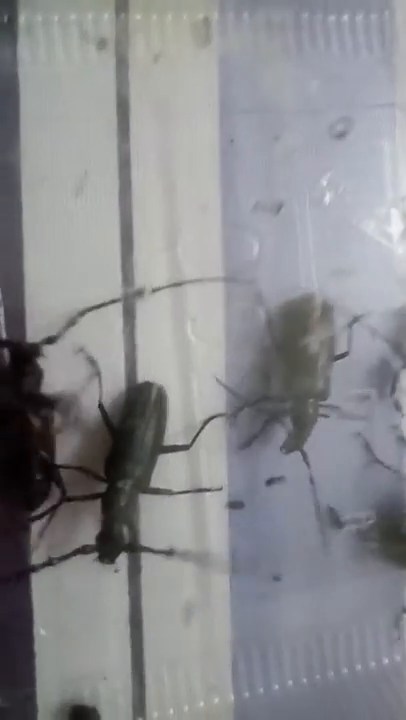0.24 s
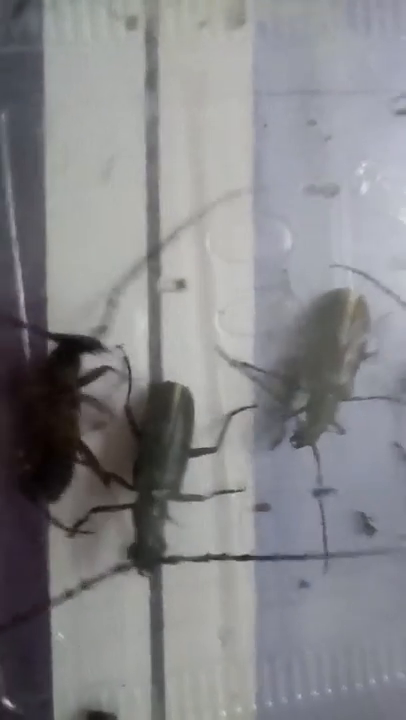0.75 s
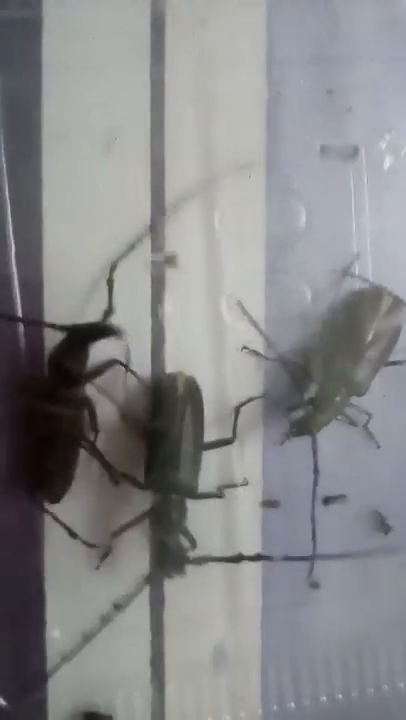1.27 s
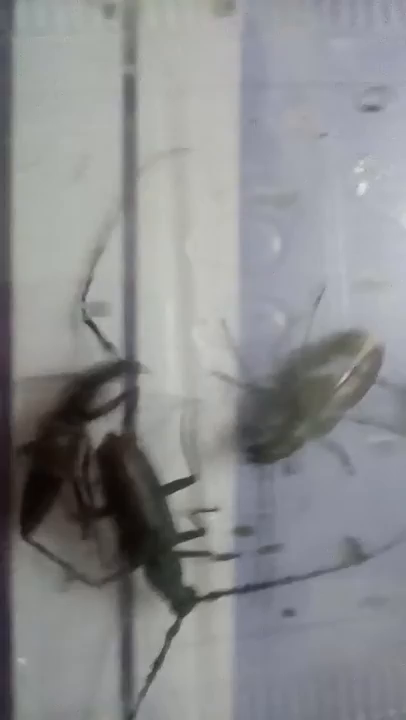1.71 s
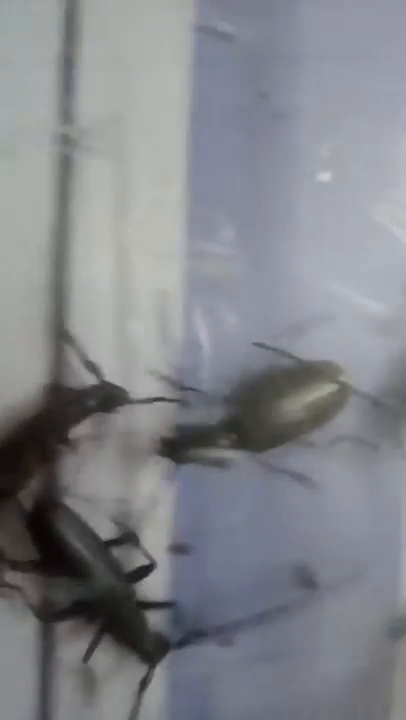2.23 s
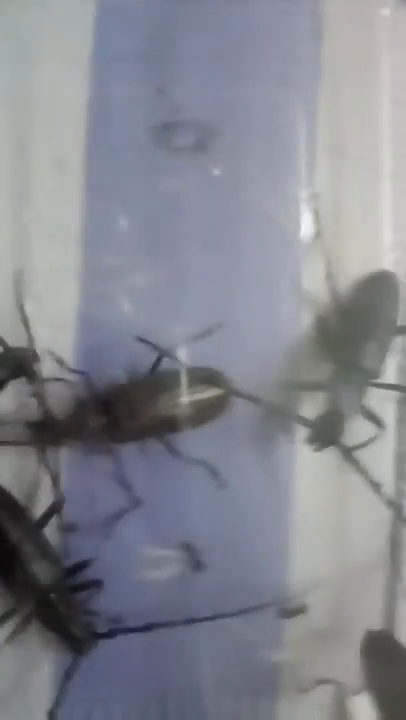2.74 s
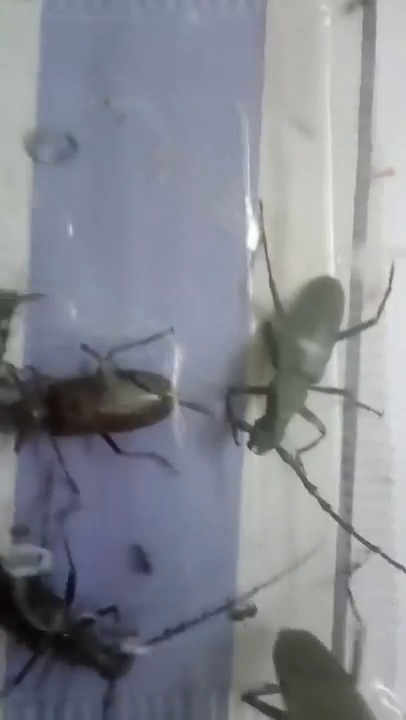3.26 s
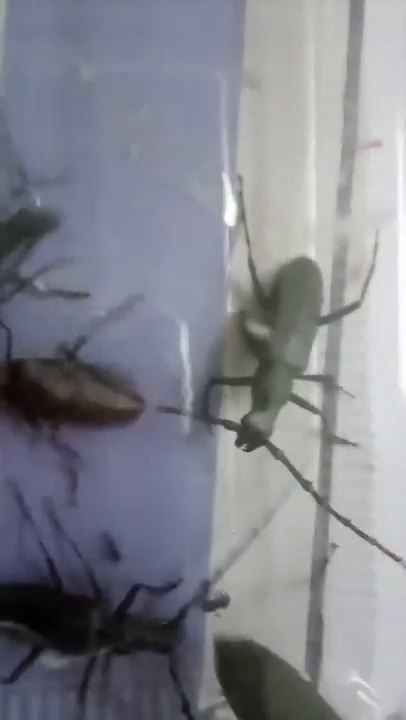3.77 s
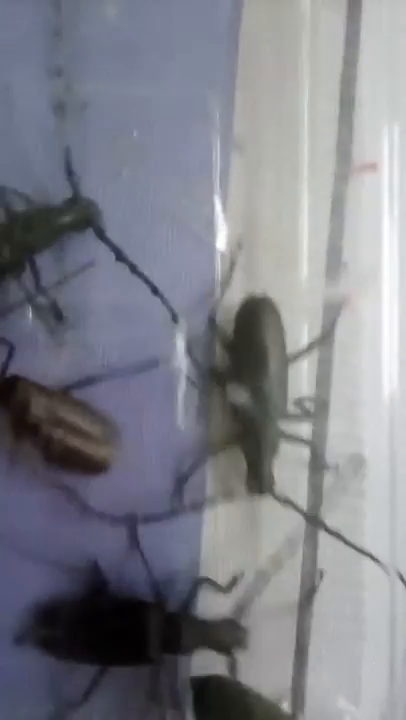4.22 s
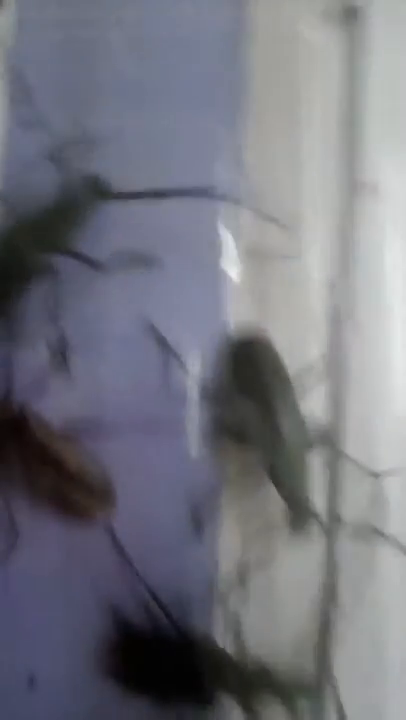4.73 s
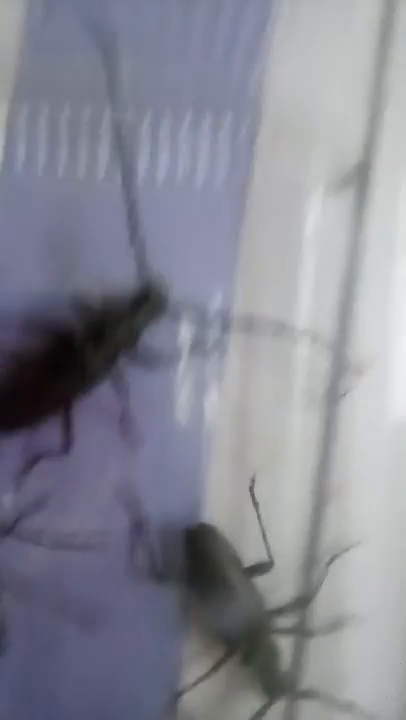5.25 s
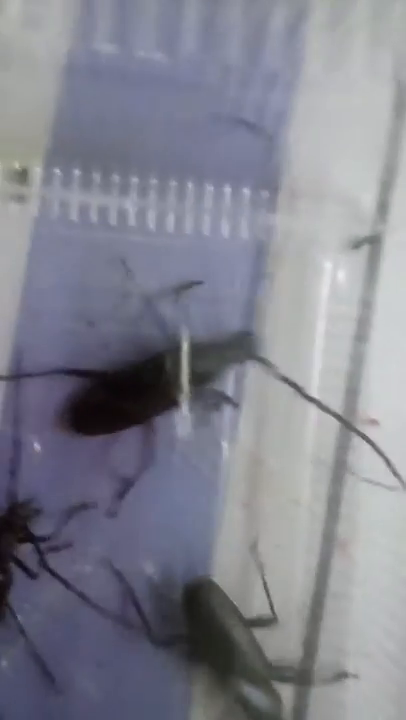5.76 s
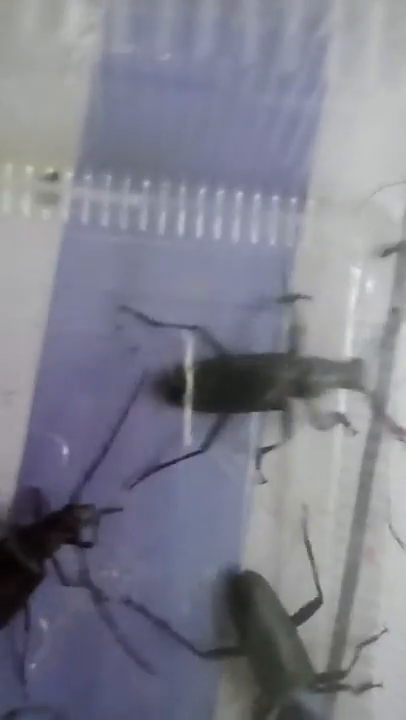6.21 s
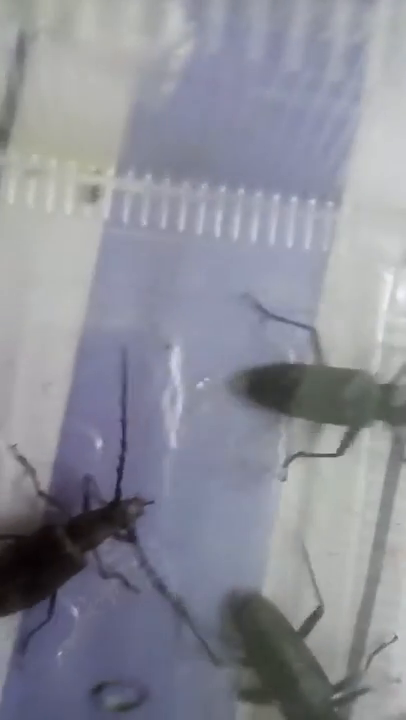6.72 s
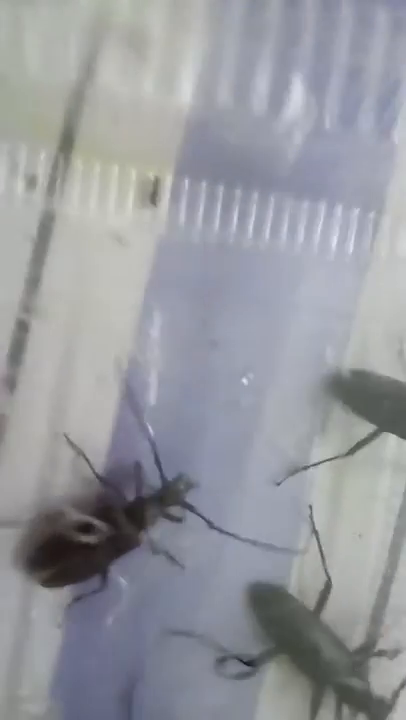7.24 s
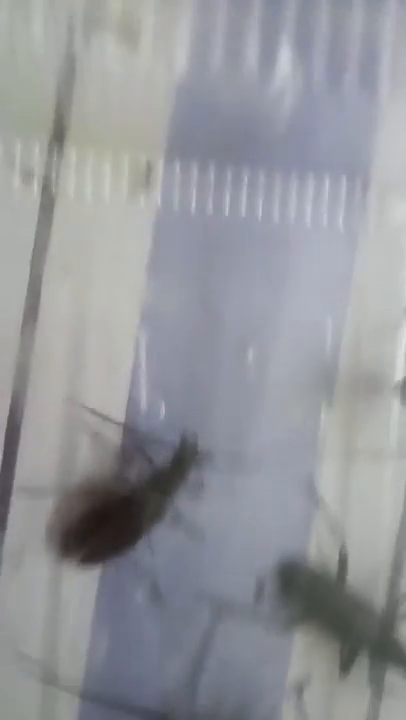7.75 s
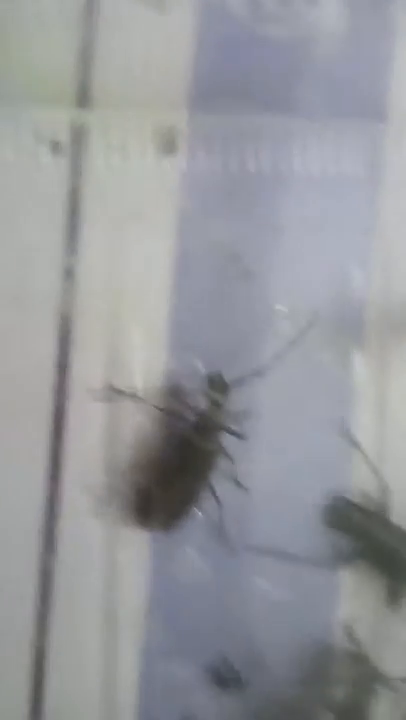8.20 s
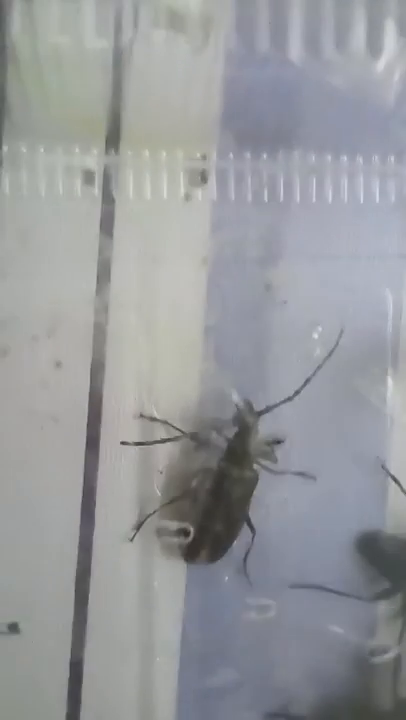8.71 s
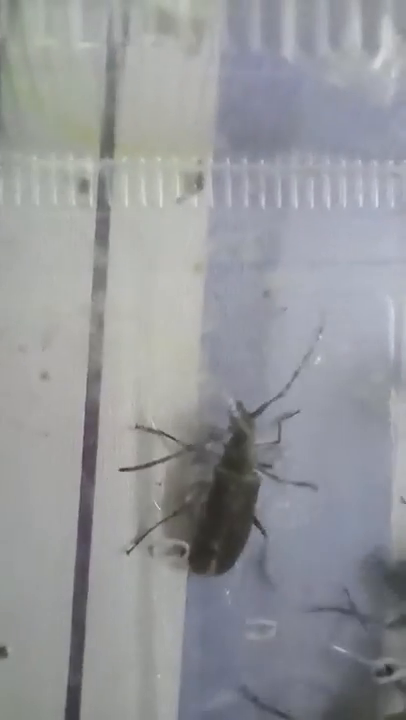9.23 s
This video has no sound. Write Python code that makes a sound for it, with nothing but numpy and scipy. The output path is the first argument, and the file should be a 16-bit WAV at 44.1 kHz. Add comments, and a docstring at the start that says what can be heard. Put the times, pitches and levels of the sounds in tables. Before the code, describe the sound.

Large beetles clamber in a thin plastic tub, close to the microphone, in a quiet room with faint hiss and a weak low hum. From 0 to 3 seconds there is fine, dry pattering with small scrapes and isolated clicks, some clustered near 2.5. At about 3.2 a claw cracks brightly and skids, with rasping and smaller ticks until 4. Sparse scratches continue; around 5 to 6 the tub is handled, giving soft hollow scuffs, a short groan and a dull knock at 5.8. A short squeak comes at 6.3, and a long scrape and sharp crack at 6.9. From 7.4 to 7.75 comes the strongest struggle: hard scrapes, rapid cracks, hollow knocks and a low rumble. Faint gliding groans follow near 7.9. At 8.4 three very quick cracks merge into one loud snap that rings briefly. Then quiet rustling, with one last click near 9.5.

```python
"""Beetles in a plastic tub

Longhorn beetles clamber about in a thin plastic tub, close to the microphone, in a quiet room. Legs fidget and
patter more strongly with effort; some drag hard, or a claw catches and skids: stick-slip and cracks ring the wall.
Handled, the tub scuffs, knocks, rumbles and groans (friction and blows on low modes, gliding tones).
Claws squeak briefly as unsteady tones; one loud snap is three quick cracks. A faint hum and hiss lie under it all.
"""
import sys
import numpy as np
from scipy import signal
from scipy.fft import rfft, irfft, next_fast_len
from scipy.io import wavfile
from scipy.ndimage import uniform_filter1d, map_coordinates

SR = 44100
rng = np.random.default_rng(int(sys.argv[2]) if len(sys.argv) > 2 else 0)


def wrap_up_sound(samples):
    """Save the sound to the file named by the first command line argument, as 16-bit audio."""
    columns = np.atleast_2d(samples).T
    # keep every value between -1 and 1, then stretch to whole-number steps
    tamed = np.clip(columns, -1, 1)
    steps = np.round(tamed * 32767).astype(np.int16)
    wavfile.write(sys.argv[1], SR, steps)


N = 417627
TIME = np.arange(N) / SR
AGE = np.arange(SR // 3) / SR  # s since the start of one event
FIRM_DB = -43  # an ordinary catch or drag


def amp(db):
    """Decibels to gain."""
    return 10 ** (np.asarray(db) / 20)


def unit(x):
    """Scale to rms 1."""
    return x / np.sqrt(np.mean(x ** 2) + 1e-20)


def peaked(x, db):
    """Scale x so that its loudest two milliseconds have this rms level."""
    power = uniform_filter1d(x * x, SR // 500)
    return x * amp(db) / np.sqrt(power.max())


def held(x, db, length_s):
    """Scale x to the energy of this rms level held for length_s."""
    return x * amp(db) * np.sqrt(length_s * SR / (np.sum(x * x) + 1e-20))


def add(track, s, x):
    """Mix x into the track at s seconds."""
    part = track[max(round(s * SR), 0):][:len(x)]
    part += x[:len(part)]


def along(points, hz):
    """(Hz, value) points read on a log frequency axis."""
    f, v = np.transpose(points)
    return np.interp(np.log(hz + 1), np.log(f + 1), v)


def wobble(rate_hz, size=N):
    """A smooth random curve, rate_hz knots a second."""
    knots = rng.standard_normal(int(size * rate_hz / SR) + 4)
    return map_coordinates(knots, [TIME[:size] * rate_hz])


def colour(x, *spectra):
    """Causal minimum-phase filter with the summed dB gains of the given spectra."""
    m = 2 * next_fast_len(len(x) // 2 + 2048)
    hz = np.fft.rfftfreq(m, 1 / SR)
    gain_db = sum(along(points, hz) for points in spectra)
    cepstrum = irfft(np.log(amp(gain_db)))
    cepstrum[1:m // 2] *= 2  # fold to the causal side
    cepstrum[m // 2 + 1:] = 0
    return irfft(rfft(x, m) * np.exp(rfft(cepstrum)))[:len(x)]


def fade(t60_s):
    """A decay that loses 60 dB in t60_s."""
    return np.exp(-np.log(1000) * AGE / t60_s)


def burst(t60_s):
    """Dying noise of energy 1: many crowded modes struck at once."""
    x = rng.standard_normal(len(AGE)) * fade(t60_s)
    return x / np.linalg.norm(x)


def ring(modes, blur_hz=0):
    """Damped sines from (Hz, dB, t60 s) rows, energy 1; random phase drift widens each line by blur_hz."""
    x = np.zeros(len(AGE))
    for hz, db, t60_s in modes:
        drift = 0
        if blur_hz:
            drift = np.cumsum(rng.standard_normal(len(AGE))) * np.sqrt(2 * np.pi * blur_hz / SR)
        x += amp(db) * fade(t60_s) * np.sin(2 * np.pi * (hz * AGE + rng.random()) + drift)
    return x / np.linalg.norm(x)


def spot(low_hz, high_hz, mean_t60_s, spread_db, count):
    """Every spot of the wall favours its own few modes; the higher ones die sooner."""
    hz = low_hz + (high_hz - low_hz) * (np.arange(count) + rng.random(count)) / count
    db = spread_db * rng.standard_normal(count)
    t60_s = mean_t60_s * np.sqrt(hz.mean() / hz)
    return ring(zip(hz, db, t60_s))


def swell(length_s):
    """Pressure rises and falls over one stroke."""
    return np.sqrt(np.abs(np.sin(np.pi * AGE / length_s))) * (AGE < length_s)


def friction(length_s, slips_per_s, size_db, wall, glide):
    """Stick and slip: tiny jerks in clumps ring the wall, whose pitch slides as the contact moves."""
    size = len(AGE)
    slips = (rng.random(size) < slips_per_s / SR) * rng.choice([-1, 1], size)
    slips = slips * amp(size_db * (rng.standard_normal(size) + wobble(86.2, size)))
    rung = signal.fftconvolve(slips * swell(length_s), wall)[:size]
    position = np.cumsum(1 + glide * wobble(14.04, size))
    return map_coordinates(rung, [position])


def whistle(length_s, db, hz, flutter_db, waver_hz=55):
    """Fast, nearly even slipping: one unsteady tone under the pressure of a stroke."""
    size = len(AGE)
    phase = 2 * np.pi * np.cumsum(hz + waver_hz * wobble(620, size)) / SR
    flutter = amp(flutter_db * wobble(82.5, size))
    return held(np.sin(phase) * swell(length_s) * flutter, db, length_s)


# Room decay: f/Hz, t60/s
ROOM_DECAY = [(150, 0.5), (600, 0.25), (4000, 0.24), (13000, 0.039)]


def room(x, wet_db, count=3):
    """Add the room's noise-like tail, a blend of count tails that changes as the tub is moved about."""
    out = x.copy()
    for k in range(count):
        hz, t, z = signal.stft(rng.standard_normal(SR // 2), SR, nperseg=256)
        decay = np.exp(-np.log(1000) * t / along(ROOM_DECAY, hz)[:, None])
        tail = signal.istft(z * decay, SR, nperseg=256)[1]
        share = np.cos(2 * np.pi * TIME + np.pi * k / count) * np.sqrt(2 / count)
        out += amp(wet_db) * signal.fftconvolve(x * share, tail / np.linalg.norm(tail))[:N]
    return out


# Colour of room air and hiss: f/Hz, relative level/dB
AIR_COLOUR = [(20, -28), (48, -3.5), (65, -12), (110, -3.5), (200, -2.5), (500, -9), (1500, -20),
              (6200, -11.5), (9000, -33), (14500, -32)]


def background(air_db=-76.0, hum_db=-81.0, hum_hz=148, waver_hz=2.06):
    """Room air and microphone hiss as coloured noise; a distant fan's hum as a sine wavering in pitch and level."""
    air = unit(colour(rng.standard_normal(N), AIR_COLOUR))
    phase = 2 * np.pi * np.cumsum(hum_hz + waver_hz * wobble(19.0)) / SR
    hum = np.sin(phase) * amp(0.24 * wobble(45))
    return amp(air_db) * air + amp(hum_db) * unit(hum)


# Beetles' struggle: t/s, effort level/dB (a calm walk is CALM_DB)
STRUGGLE = [(0.0, -62), (0.34, -73.5), (2.11, -73), (2.6, -66), (2.77, -85.5), (2.92, -65.5), (3.27, -51),
            (3.6, -60.5), (3.83, -60.5), (3.9, -89), (3.98, -63), (4.3, -62), (4.52, -69), (7.35, -66),
            (7.55, -43), (7.84, -68.5), (8.49, -69), (8.78, -73)]
CALM_DB = -70


def effort(s):
    """Decibels by which the beetles' struggle exceeds a calm walk."""
    return np.interp(s, *np.transpose(STRUGGLE)) - CALM_DB


# Colour of the thin plastic wall: f/Hz, gain/dB
WALL_COLOUR = [(30, -99), (100, -21), (650, -19.5), (1500, -9.5), (2800, -8.5), (3950, -2.5), (4500, 1.5),
               (5400, 3), (6000, 8.5), (6700, -0.5), (7500, -6), (8400, -8), (9500, -18.5), (14500, -34)]


def shuffle(calm_level_db=-76, db_per_db=1.213, slips_per_s=1000, size_db=2.0, sway_db=4, body_db=1):
    """Bodies and legs never quite stop sliding: a fine, fluttering grain of slips that swells with effort."""
    slips = (rng.random(N) < slips_per_s / SR) * rng.standard_normal(N)
    slips = slips * amp(size_db * wobble(110) + sway_db * wobble(13))
    rung = signal.fftconvolve(slips, burst(0.021))[:N]
    grain = unit(colour(rung, WALL_COLOUR, [(2700, body_db), (4800, 0.025)]))
    return amp(calm_level_db + db_per_db * effort(TIME)) * grain


def ticks(per_s=38, size_db=5, calm_level_db=-76.0, db_per_db=0.16, count=8):
    """Tiny foot contacts patter without pause, each foot ringing its own part of the wall, harder with effort."""
    out = np.zeros(N)
    for foot in range(count):
        force = amp(size_db * np.clip(rng.standard_normal(N), -2, 2))
        steps = (rng.random(N) < per_s / count / SR) * force
        wall = spot(2300, 7500, mean_t60_s=0.07, spread_db=6.5, count=7) + burst(0.01)
        out += signal.fftconvolve(steps, wall)[:N]
    patter = unit(colour(out, WALL_COLOUR))
    return room(amp(calm_level_db + db_per_db * effort(TIME)) * patter, wet_db=-20.0)


# Resonances shared by the whole wall: f/Hz, relative level/dB, t60/s
SHARED_MODES = [(1176, -6.5, 0.044), (2805, 7, 0.021), (3263, -2, 0.044), (4740, -13.5, 0.11),
                (6430, -3, 0.096)]
STROKE_DROP_DB = 8.5  # grip lost over a stroke


def scrape(length_s, db, body_db, slips_per_s=650, ring_db=0, damping_db_per_db=0.4, shared_db=-1):
    """A leg drags over a fresh spot and gradually loses grip; hard pressure damps the spot's ring."""
    spot_db = ring_db - damping_db_per_db * (db - FIRM_DB)
    wall = burst(0.0061) + amp(shared_db) * ring(SHARED_MODES)
    wall = wall + amp(spot_db) * spot(708.0, 7978, mean_t60_s=0.04, spread_db=3.5, count=13)
    rasp = friction(length_s, slips_per_s, size_db=3.0, wall=wall, glide=0.01234)
    rasp = rasp * amp(-STROKE_DROP_DB * np.minimum(AGE / length_s, 1))
    return held(colour(rasp, WALL_COLOUR, [(2700, body_db), (4800, 0.01)]), db, length_s)


def fidget(calm_level_db=-67.0, spread_db=4, db_per_db=0.52, body_db=1.5, stroke_s=0.029,
           longer_db_per_db=1.09, count=110):
    """All the other legs make short strokes at random, stronger and longer with effort."""
    out = np.zeros(N)
    for k, (when, stretch, strength) in enumerate(rng.random((count, 3))):
        s = (k + when) * N / SR / count
        length_s = stroke_s * (.5 + stretch) * amp(longer_db_per_db * effort(s))
        length_s = min(length_s, AGE[-1])
        db = calm_level_db + db_per_db * effort(s) + spread_db * (2 * strength - 1)
        add(out, s - length_s / 2, scrape(length_s, db, body_db))
    return room(out, wet_db=-8.0)


# Strong leg strokes: start t/s, length/s, level/dB before gain_db, body/dB before body_db
STROKES = [(0.127, 0.073, -48.5, 4), (0.173, 0.084, -52.5, 10.5), (0.962, 0.072, -61.5, 4),
           (1.153, 0.03, -58, 8.5), (1.181, 0.063, -55, 0), (1.521, 0.077, -57, 16.5),
           (2.282, 0.085, -61, 4), (2.418, 0.099, -66, -7), (2.518, 0.2, -57.5, -17),
           (3.215, 0.052, -42.5, -11), (3.242, 0.012, -38.5, 6), (3.315, 0.11, -49.5, 1),
           (3.47, 0.073, -54, 13), (4.036, 0.05, -54, 0), (4.149, 0.075, -52, 5.5), (4.434, 0.046, -55, -2),
           (4.624, 0.04, -50.5, 10), (5.187, 0.065, -49, 7.5), (5.266, 0.029, -52.5, 10),
           (5.421, 0.018, -58.5, -4), (5.769, 0.085, -57, 7.5), (5.868, 0.021, -55, 4),
           (6.149, 0.018, -57.5, -1), (6.314, 0.037, -47.5, 1), (6.456, 0.079, -51.5, 4),
           (6.591, 0.031, -52.5, -4), (6.87, 0.11, -39.5, -4.5), (6.99, 0.11, -51, -9),
           (7.249, 0.05, -49.5, 7.5), (7.45, 0.083, -35.5, 5), (7.593, 0.038, -36, -12),
           (7.712, 0.056, -44, 8.5), (8.148, 0.048, -55.5, -7), (8.312, 0.16, -57.5, 7.5),
           (9.011, 0.11, -66, 2)]


def scrabble(gain_db=-1, body_db=-1):
    """The strong strokes of single legs, each a stick-slip scrape."""
    out = np.zeros(N)
    for s, length_s, db, body in STROKES:
        add(out, s, scrape(length_s, db + gain_db, body + body_db))
    return room(out, wet_db=-10.0)


# Colour of the tub's body: f/Hz, gain/dB
TUB_COLOUR = [(60, -75.5), (200, -2.5), (550, -4.5), (1000, -6), (1600, -10.5), (3000, -18), (8000, -82)]
# Firm rubs: start t/s, length/s, level/dB before gain_db, pitch f/Hz
FIRM_RUBS = [(0.139, 0.089, -65.5, 734), (2.107, 0.072, -68.5, 1047), (2.991, 0.073, -66.5, 418),
             (3.629, 0.086, -63.5, 830), (5.119, 0.3, -63, 441), (5.199, 0.073, -62.5, 775),
             (5.345, 0.072, -65.5, 1430), (5.661, 0.039, -63.5, 1910), (5.786, 0.052, -53, 605),
             (5.874, 0.048, -53, 464), (6.522, 0.042, -59, 494), (6.728, 0.075, -57.5, 383),
             (6.859, 0.12, -52, 647), (7.021, 0.042, -57.5, 1336), (7.258, 0.059, -57, 1974),
             (7.439, 0.13, -50.5, 586), (8.265, 0.12, -60.5, 742)]
# Light finger brushes; level before gain_db, median pitch
BRUSH_PER_S, BRUSH_S, BRUSH_DB, BRUSH_HZ = 2.8, 0.17, -74.5, 578


def rubs(gain_db=-2.5, dull_db=-15, upper_db=-4, brush_octaves=0.372):
    """Soft friction stirs the tub's low modes into a sliding, hollow scuff; light brushes fall at random."""
    out = np.zeros(N)
    brushes = []
    for slot_s in np.arange(0, N / SR, 1 / BRUSH_PER_S):
        s = slot_s + rng.random() / BRUSH_PER_S
        pitch_hz = BRUSH_HZ * 2 ** (brush_octaves * rng.standard_normal())
        brushes.append((s, BRUSH_S, BRUSH_DB, pitch_hz))
    for s, length_s, db, pitch_hz in list(FIRM_RUBS) + brushes:
        low = spot(.7 * pitch_hz, 1.35 * pitch_hz, mean_t60_s=0.04, spread_db=5.5, count=3)
        upper = spot(1.35 * pitch_hz, 4 * pitch_hz, mean_t60_s=0.025, spread_db=8.0, count=6)
        wall = amp(dull_db) * burst(0.048) + low + amp(upper_db) * upper
        rub = friction(length_s, slips_per_s=580, size_db=1.5, wall=wall, glide=0.1109)
        add(out, s, held(colour(rub, TUB_COLOUR), db + gain_db, length_s))
    return room(out, wet_db=-8.5)


# Rumble under a rub whose table level is PRESS_DB, and its growth with force
FLEX_DB, FLEX_DB_PER_DB, PRESS_DB = -42, 4, -48.5
KNOCK_FLEX_S = 0.059  # how long the tub gives under a knock


def thuds():
    """The tub flexes with a low noise rumble under knocks and firm rubs, the more the harder it is rubbed."""
    out = np.zeros(N)
    flex = [(25, -8), (70, -21), (100, -1.0), (160, 4.5), (210, -3), (400, -4), (1200, -51.5)]
    pressed = [(s, length_s, FLEX_DB + FLEX_DB_PER_DB * (db - PRESS_DB)) for s, length_s, db, _ in FIRM_RUBS]
    knocked = [(s, KNOCK_FLEX_S, rumble_db) for s, _, _, rumble_db in HOLLOW_KNOCKS]
    for s, length_s, db in pressed + knocked:
        push = rng.standard_normal(len(AGE)) * swell(length_s)
        add(out, s, held(colour(push, flex), db, length_s))
    return out


# Hardest claw catches: t/s, peak level/dB before gain_db, ringing pitch f/Hz, sharp edge/dB before edge_db
CATCHES = [(0.208, -39.5, 6070, 4), (0.479, -49, 6130, 5), (1.062, -49, 6100, 4), (1.752, -41.5, 6570, -30),
           (2.519, -44, 6220, 17), (2.563, -42.5, 6730, 12), (2.623, -52, 5860, 0),
           (3.156, -36.5, 6500, 11), (3.243, -22.5, 6680, 10.5), (3.4, -36, 5950, -6),
           (3.46, -42, 5860, -2), (3.642, -41, 6900, -25), (3.722, -34.5, 6690, 2),
           (3.735, -38.5, 4900, -9), (3.924, -35, 5690, 5), (4.022, -51.5, 2700, 12),
           (4.236, -46.5, 2880, 17), (4.323, -44.5, 6110, 5), (4.345, -54, 6400, 23),
           (4.626, -46.5, 2810, 19), (4.698, -35.5, 6640, -12), (5.362, -42.5, 6300, 8),
           (5.598, -46, 6270, 10), (5.873, -33.5, 6280, 6), (6.775, -56, 5280, 28), (6.882, -40, 7000, -9),
           (6.922, -24, 5850, 10), (7.426, -28, 4200, -33), (7.493, -18.5, 6050, -12),
           (7.612, -25, 6340, 8), (7.68, -24, 5740, -6), (7.712, -21, 5460, 1), (7.729, -26, 5520, 3),
           (9.226, -53, 6840, 10), (9.289, -68, 6400, -5), (9.463, -33, 5270, -10)]
# Skid around a catch of FIRM_DB, and its growth with force
SKID_S, SKID_DB, SKID_DB_PER_DB = 0.039, -57, 0.6252
SKID_LEAD_S = 0.0072  # slide before the claw lets go


def claws(gain_db=-3.0, body_db=1, edge_db=2, note_db=5.5, rise_s=0.00016):
    """A claw lets go with a crack, rings its spot of the wall at one main pitch and skids a little."""
    out = np.zeros(N)
    for s, db, pitch_hz, edge in CATCHES:
        blow = burst(0.022) + spot(1565.0, 8800, mean_t60_s=0.022, spread_db=0.5, count=12)
        tilt = [(2200, body_db), (4500, 0.044), (7000, 0.009), (10000, edge_db + edge)]
        note = colour(ring([(pitch_hz, 0, 0.04)], blur_hz=100), WALL_COLOUR)
        catch = unit(colour(blow, WALL_COLOUR, tilt)) + amp(note_db) * unit(note)
        add(out, s, peaked(catch * (1 - np.exp(-AGE / rise_s)), db + gain_db))
        skid_db = SKID_DB + SKID_DB_PER_DB * (db - FIRM_DB)
        add(out, s - SKID_LEAD_S, scrape(SKID_S, skid_db, body_db))
    return room(out, wet_db=-10.5)


# Claw squeaks on smooth plastic: start t/s, length/s, level/dB, f/Hz
CLAW_SQUEAKS = [(1.156, .022, -59, 2700), (1.397, .042, -64, 3220), (3.2, .33, -73, 9400),
                (3.923, .009, -48, 8200), (6.15, .03, -63, 2120), (6.323, .016, -49, 2000)]
# Groans of sliding fingertips: start t/s, length/s, level/dB, first f/Hz, last f/Hz
FINGER_GROANS = [(5.018, 0.048, -65, 620, 615), (7.817, 0.09, -67.5, 553, 424),
                 (7.899, 0.073, -62, 410, 546), (7.914, 0.067, -67, 837, 770),
                 (8.942, 0.099, -67.5, 782, 853)]


def squeaks():
    """Near-even slipping: claws make thin, broken whistles, fingertips low, gliding groans."""
    out = np.zeros(N)
    for s, length_s, db, hz in CLAW_SQUEAKS:
        add(out, s, whistle(length_s, db, hz, flutter_db=12))
    for s, length_s, db, start_hz, end_hz in FINGER_GROANS:
        glide_hz = np.interp(AGE, [0, length_s], [start_hz, end_hz])
        add(out, s, whistle(length_s, db, glide_hz, flutter_db=7))
    return room(out, wet_db=-5.5)


# Hollow knocks on the tub: t/s, peak level/dB, pitch f/Hz, rumble level/dB
HOLLOW_KNOCKS = [(3.659, -62, 900, -67), (4.835, -54, 694, -77), (5.278, -57.5, 607, -69),
                 (5.596, -58.5, 402, -77), (5.807, -41, 601, -58.5), (6.325, -55, 1090, -68),
                 (7.424, -30.5, 740, -43.5), (7.711, -35.5, 729, -68), (8.185, -59.5, 400, -78)]


def knocks(flank_db=7, ring_db=1):
    """A blunt tap gives one short push and leaves the tub's low modes ringing."""
    out = np.zeros(N)
    for s, db, pitch_hz, _ in HOLLOW_KNOCKS:
        hollow = [(pitch_hz / 2, -flank_db), (pitch_hz, 0), (2 * pitch_hz, -flank_db)]
        modes = spot(pitch_hz / 2, 1.7 * pitch_hz, mean_t60_s=0.054, spread_db=2.5, count=6)
        blow = burst(0.0134) + amp(ring_db) * modes
        add(out, s, peaked(colour(blow, TUB_COLOUR, hollow), db))
    return room(out, wet_db=-5.5)


# Cracks of the wall's snap: t/s, peak level/dB before gain_db
CRACKS = [(8.412, -21), (8.422, -26.5), (8.441, -24)]
# Modes of the snapping wall: f/Hz, relative level/dB, t60/s
CRACK_MODES = [(655, -7, 0.36), (2033, -3, 0.37), (2474, -6, 0.46), (3707, 6, 0.088), (3850, 9, 0.33),
               (4120, 3.5, 0.4), (4850, 3, 0.41), (5740, 8, 0.3), (6560, 11.5, 0.37)]


def snap(gain_db=-3.5, ring_db=5, dull_db=-14, tail_db=-3, rise_s=0.00043):
    """The wall springs back in three quick cracks; its crowded modes ring out into the room."""
    out = np.zeros(N)
    radiation = [(30, -85), (500, -3.5), (2500, -1.5), (6800, -0.5), (9000, dull_db), (14000, 2 * dull_db)]
    for s, db in CRACKS:
        crack = unit(colour(burst(0.022) + amp(tail_db) * burst(0.35), WALL_COLOUR))
        modes = ring(CRACK_MODES, blur_hz=108.5) * (1 + 2.8 * fade(0.018))  # stronger at first
        body = unit(colour(modes, radiation))
        onset = 1 - np.exp(-AGE / rise_s)
        add(out, s, peaked((crack + amp(ring_db) * body) * onset, db + gain_db))
    return room(out, wet_db=-1.5)


def scene():
    """Everything heard at one microphone."""
    beetles = shuffle() + ticks() + fidget() + scrabble() + claws() + squeaks()
    tub = rubs() + thuds() + knocks() + snap()
    return (background() + beetles + tub)[None]


TOP_HZ = 14600


def record(dry):
    """The recorder's steep low-pass: 80 dB down above its band limit."""
    low_pass = signal.ellip(10, .1, 80, TOP_HZ, fs=SR, output="sos")
    return signal.sosfilt(low_pass, dry)


dry = scene()
out = record(dry)
wrap_up_sound(out)
```